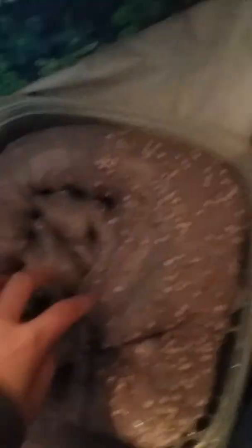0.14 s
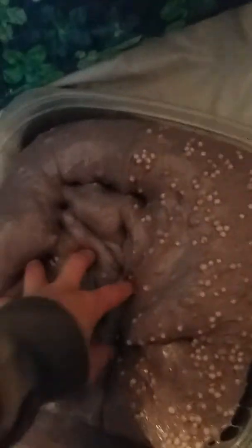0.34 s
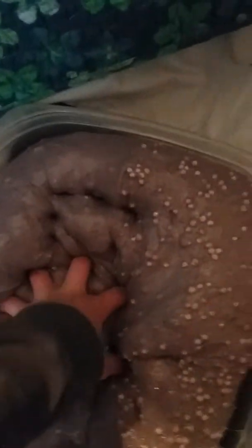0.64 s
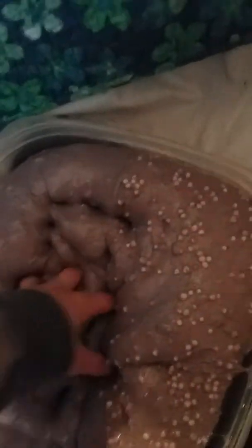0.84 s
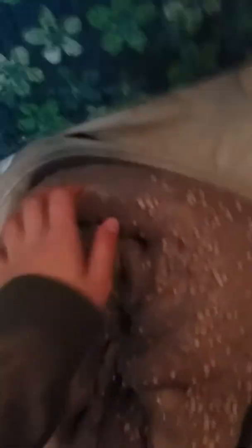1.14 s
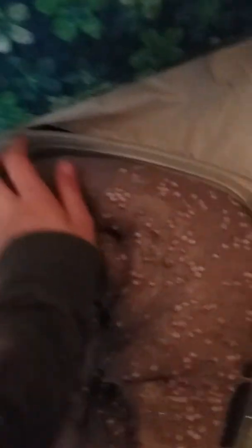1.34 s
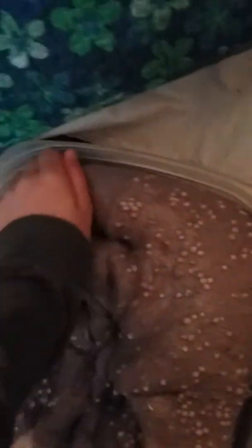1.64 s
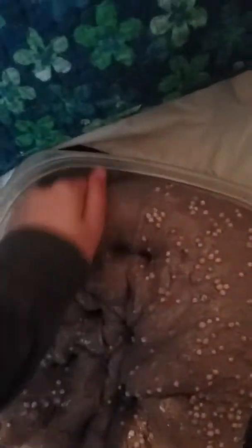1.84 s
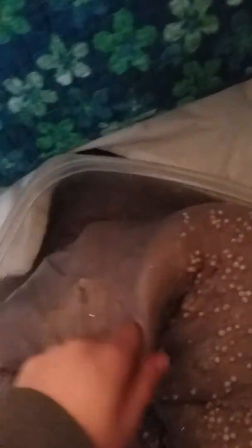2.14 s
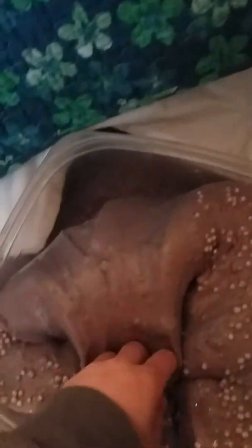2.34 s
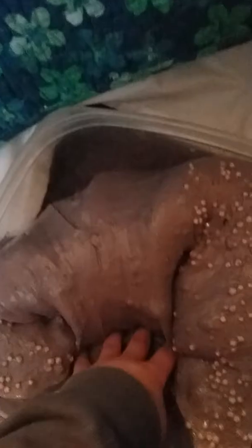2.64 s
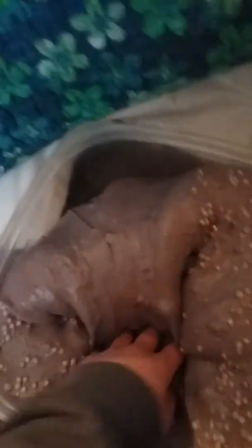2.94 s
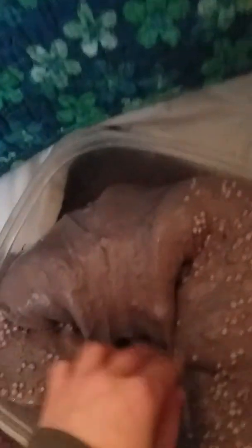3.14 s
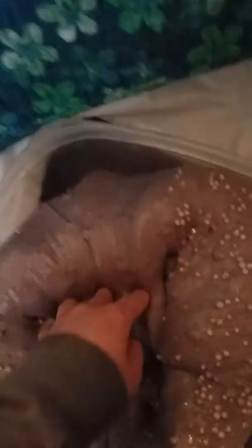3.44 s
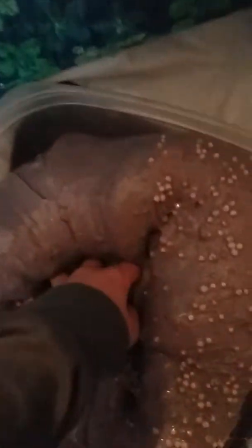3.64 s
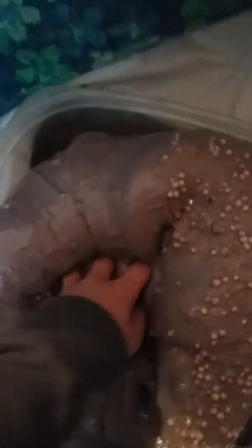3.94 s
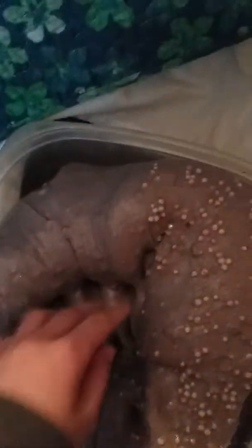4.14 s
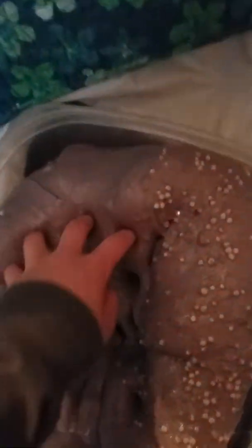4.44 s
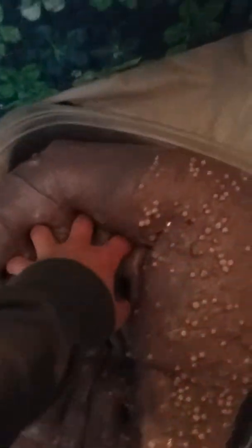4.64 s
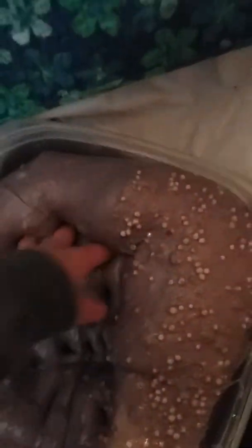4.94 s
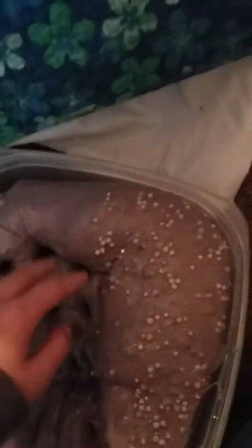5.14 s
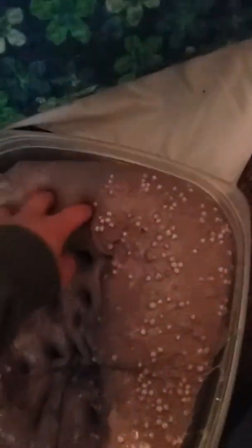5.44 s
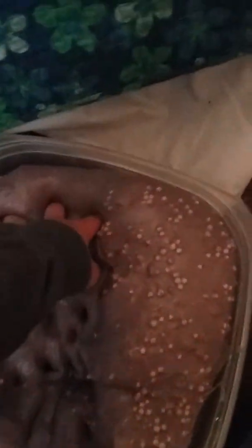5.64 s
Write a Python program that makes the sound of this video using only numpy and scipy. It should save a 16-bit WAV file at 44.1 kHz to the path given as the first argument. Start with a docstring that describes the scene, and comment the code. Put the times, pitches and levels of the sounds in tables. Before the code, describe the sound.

Sharp wet pops and clicky crackles burst from squeezed bead slime, close up in a quiet small room, over a low hum.

```python
"""A hard squeeze of slime snaps and crackles at once, close by in a small, soft room; more squeezes follow.
A hand works thick slime with foam beads in a plastic tub and bursts runs of air pockets: noise bursts make
the skin snap, damped sines make the pockets ring, and random clicks make the tiny bubbles crackle.
The hand that holds the phone rubs and bumps it near the right microphone, as coloured noise and low thumps.
Faint room noise and a wavering low hum lie under everything."""
import sys
import numpy as np
from scipy import signal
from scipy.fft import rfft, irfft
from scipy.io import wavfile

SR = 44100
rng = np.random.default_rng(int(sys.argv[2]) if len(sys.argv) > 2 else 0)


def master_out(mix):
    """Clip the mix to full scale and print it as 16-bit PCM to the path in sys.argv[1]."""
    frames = np.transpose(np.atleast_2d(mix))
    ceiling = np.clip(frames, -1, 1)
    pcm = np.round(ceiling * 32767).astype(np.int16)
    wavfile.write(sys.argv[1], SR, pcm)


N = 254456


def gain_of(db):
    """Decibels to gain."""
    return 10 ** (np.asarray(db) / 20)


def evened(x):
    """Scales to rms 1."""
    return x / np.sqrt(np.mean(x ** 2) + 1e-20)


def read(points, hz):
    """Reads a curve of (frequency, value) points on a log-frequency axis."""
    f, value = np.transpose(points)
    return np.interp(np.log(hz + 1), np.log(f + 1), value)


def add(mix, s, sound, lead_s=0):
    """Mixes a sound in at s seconds, shifted by its lead-in."""
    at = round((s + lead_s) * SR)
    sound = sound[..., max(-at, 0):]
    part = mix[..., max(at, 0):][..., :sound.shape[-1]]
    part += sound[..., :part.shape[-1]]


def colour(x, points, size=4096):
    """Minimum-phase filter with the given spectrum, so that attacks stay sharp."""
    level_db = read(points, abs(np.fft.fftfreq(size, 1 / SR)))
    log_gain = np.log(gain_of(level_db))
    response = np.exp(np.conj(signal.hilbert(log_gain)))
    taps = np.fft.ifft(response).real[:size // 2]
    return signal.oaconvolve(x, taps[None], axes=1)[:, :x.shape[1]]


def resonate(x, hz, width):
    """A resonance with gain 1 at its peak."""
    b, a = signal.iirpeak(min(hz, SR / 2 - 2000), hz / min(width, SR / 4), SR)
    return signal.lfilter(b, a, x)


def drift(hz):
    """Slow random wander of rms 1, its spectrum fading smoothly towards and above hz."""
    fade = np.exp(-(np.fft.rfftfreq(N, 1 / SR) / hz) ** 2)
    return evened(irfft(rfft(rng.standard_normal(N)) * fade, N))


def clicks(per_s, spread_db, size=N):
    """Random clicks, most of them small."""
    height = gain_of(spread_db * np.minimum(rng.exponential(1, size), 4))
    sign = rng.choice([-1, 1], size)
    return height * sign * (rng.random(size) < per_s / SR)


def pocket(t, hz, cycles, opening_s, rise):
    """An air pocket rings and dies within a few cycles; its pitch rises as the hole widens."""
    turns = hz * t * (1 + rise * (1 - np.exp(-t * hz / cycles / 2)))
    envelope = (1 - np.exp(-t / opening_s)) * np.exp(-t * hz / cycles)
    return envelope / envelope.max() * np.sin(2 * np.pi * turns)


def thumps(rows, cycles, opening_s):
    """Low, heavily damped blows of steady pitch."""
    out, t = np.zeros(N), np.arange(4400) / SR
    for s, db, hz in rows:
        add(out, s, gain_of(db) * pocket(t, hz, cycles, opening_s, rise=0))
    return out


def swell(t, rise_s, fall_s, hold_s=0):
    """Rises until t = 0, holds, dies away."""
    return np.exp(np.minimum(t / rise_s, 0) - np.maximum(t - hold_s, 0) / fall_s)


# likeness of the two microphones in the room noise: (frequency [Hz], correlation [0 to 1])
MIC_LIKENESS = [(100, 0.25), (1000, 0.47), (2500, 0.21), (5000, 0.083), (16000, 0.087)]


def pair(z):
    """Two unrelated signals become a microphone pair, partly alike by frequency."""
    a, b = rfft(z)
    same = read(MIC_LIKENESS, np.fft.rfftfreq(z.shape[1], 1 / SR))
    return irfft(np.array([a, same * a + np.sqrt(1 - same ** 2) * b]), z.shape[1])


# spectrum of the still air in the room: (frequency [Hz], relative level per Hz [dB])
AIR_SPECTRUM = [(20, -19), (35, -8.5), (55, 14), (85, 8), (130, 11), (190, 2.5), (350, -7), (700, -12.5),
                (1000, -11.5), (2500, -14), (6000, -14), (16000, -19)]
AIR_DB = -67  # rms
# partials of the low hum: (frequency [Hz], middle rms level [dB], rms pitch wander [Hz])
HUM_PARTIALS = [(56, -69, 4.5), (113.8, -68.5, 8.4)]


def background():
    """Coloured noise for the room air, and sines that waver in pitch and level for the hum."""
    air = gain_of(AIR_DB) * evened(colour(pair(rng.standard_normal((2, N))), AIR_SPECTRUM))
    hum = np.zeros(N)
    for hz, db, wander_hz in HUM_PARTIALS:
        level = gain_of(db + 3.0 * drift(hz=9))
        turns = np.cumsum(hz + wander_hz * drift(hz=6.2)) / SR
        hum += level * np.sqrt(2) * np.sin(2 * np.pi * turns)
    return air + hum


# spectrum of skin rubbing the case: (frequency [Hz], relative level per Hz [dB])
RUB_SPECTRUM = [(25, -31), (38, -15), (60, -9.5), (115, 11), (190, 0), (380, -4.5), (580, -2), (950, -12),
                (1300, -9), (2000, -18.5), (2700, -14), (4300, -27), (8500, -27.5), (16000, -38)]
# the grip slides on the phone: (middle [s], length [s], peak level before the rub trim [dB])
GRIP_SLIDES = [(0.01, .1, -62), (0.329, .14, -46), (0.534, 0.2, -49), (0.716, 0.13, -53),
               (1.381, 0.25, -59), (1.846, 0.42, -56.5), (2.235, .13, -53), (2.406, .12, -48),
               (2.75, 0.5, -61), (2.858, 0.14, -52.5), (3.145, 0.16, -50), (3.354, 0.26, -58),
               (3.606, 0.13, -48), (3.842, 0.38, -53), (4.528, 0.29, -63), (4.671, 0.17, -48),
               (5.558, 0.042, -59), (5.64, 0.14, -55)]
# the grip shifts and bumps the phone: (time [s], level [dB], pitch [Hz])
GRIP_BUMPS = [(.262, -39, 61), (.338, -38.5, 72), (2.87, -45, 102), (4.665, -37, 113), (5.538, -37.5, 65.4),
              (5.552, -48, 55), (5.627, -42, 117)]
SLIDE_EDGE_DB = -13.5  # level at either end of a slide, against its middle
RESTING_DB = -77.5  # the resting hand never quite keeps still; before the rub trim


def grip(rub_db=1, left_db=-19, flutter_db=2):
    """Skin creeps over the phone's case in small slips and bumps it, next to the right microphone."""
    t = np.arange(N) / SR
    sliding = gain_of(RESTING_DB)
    for middle, length, db in GRIP_SLIDES:
        from_middle = (2 * (t - middle) / length) ** 2  # 1 at the ends
        sliding = sliding + gain_of(db + SLIDE_EDGE_DB * np.minimum(from_middle, 10))
    slips = rng.standard_normal((2, N)) + clicks(per_s=130, spread_db=4)
    rub = evened(colour(slips, RUB_SPECTRUM)) * gain_of(flutter_db * drift(hz=35))
    bumps = thumps(GRIP_BUMPS, cycles=0.83, opening_s=0.003)
    case = rub * sliding * gain_of(rub_db) + bumps
    return case * gain_of([[left_db], [0]])


# decay of the room tail: (frequency [Hz], time to fall 60 dB [s])
ROOM_DECAY = [(150, 0.44), (500, 0.32), (1200, 0.049), (3000, 0.23), (8000, 0.073), (16000, 0.21)]


def room(x, near_db=-12, near_s=0.0094, first_s=0.0011, tail_db=-23):
    """Quick reflections from the tub walls and the arm, then a faint room tail."""
    t = np.arange(SR // 2) / SR
    taps = rng.choice([-1., 1.], (2, len(t))) * (rng.random((2, len(t))) < 4000 / SR)
    near = taps * (t > first_s) * np.exp(-t / near_s)
    late_noise = rng.standard_normal(taps.shape) * (t > .008)
    hz, at, z = signal.stft(late_noise, SR, nperseg=256)
    decay = gain_of(-60 * at / read(ROOM_DECAY, hz)[:, None])
    tail = signal.istft(z * decay, SR, nperseg=256)[1][:, :len(t)]
    echo = np.zeros(taps.shape)
    for db, part in [(near_db, near), (tail_db, tail)]:
        echo += gain_of(db) * part / np.linalg.norm(part, axis=1, keepdims=True)
    return x + signal.oaconvolve(x, echo, axes=1)[:, :N]


# resonances in the hollow of the tub: (frequency [Hz], width [Hz], relative level [dB])
TUB_MODES = [(169, 97, -9), (312.2, 46, -7), (597, 42, -6), (850, 59, -21.5), (981.5, 71, -2.5),
             (1310, 19, -11), (1830, 97, -6), (3000, 140, -9)]


def tub(x):
    """The hollow of the tub rings along."""
    return sum(gain_of(db) * resonate(x, hz, width) for hz, width, db in TUB_MODES)


# large pockets that collapse under a hard squeeze: (time [s], level [dB], pitch [Hz])
LARGE_POCKETS = [(0.011, -43, 300), (0.967, -34, 400), (0.9833, -38.5, 215), (1.7, -44, 400),
                 (3.088, -47.5, 210), (4.115, -35.5, 240), (4.9985, -29.5, 570), (5.047, -32, 350)]


def gulps():
    """Large pockets collapse with a low, short thump."""
    return thumps(LARGE_POCKETS, cycles=0.86, opening_s=0.0008)


GRAB_S, LET_GO_S = .005, .017  # rise and fall time constants of the hand's pressure
BUILD_DB = 7.5  # growth of the pressure through a stretch of pressing


def pressure(t, length):
    """The fingers grab, press harder and harder, and let go."""
    build = gain_of(-BUILD_DB * np.clip(1 - t / length, 0, 1))
    return swell(t, GRAB_S, LET_GO_S, length) * build


# the fingers work the slime, one row for each stretch of pressing; a squeeze may take several:
# (start [s], length [s], crackle level [dB], squelch level [dB], pitch of the small pockets [Hz])
PRESSINGS = [(0.0, 0.073, -53.5, -53.5, 1240), (0.831, 0.021, -57.5, -59.5, 900),
             (0.894, .095, -48.5, -47.5, 946), (1.348, 0.11, -62.5, -63, 1200),
             (1.636, 0.027, -53.5, -54, 1100), (1.854, 0.056, -60.5, -51, 850),
             (1.908, 0.081, -56.5, -54.5, 730), (2.017, 0.045, -61, -64.5, 1770),
             (2.964, 0.03, -56.5, -59, 1600), (3.029, 0.071, -54, -53, 1250),
             (3.969, 0.027, -56.5, -57, 850), (4.035, 0.076, -46, -47.5, 967),
             (4.972, 0.045, -47.5, -52.5, 1050), (5.06, 0.047, -52.5, -57.5, 1000)]
# spectrum of the tiny bubbles: (frequency [Hz], relative level per Hz [dB])
CRACKLE_SPECTRUM = [(100, -19.5), (800, -10), (2200, 2), (4500, -0.5), (8500, -1), (12000, -4),
                    (16000, -8.5)]
BURST_CRACKLE_DB = -17  # crackle around each burst, against the snap level in its row
CRACKLE_SWELL, CRACKLE_FADE = 1.5, 2.6  # its swell and its fading [tearing times]


def crackle():
    """Tiny bubbles click at random under the fingers and around each burst."""
    t, power = np.arange(-.05, .3, 1 / SR), np.zeros(N)
    for start, length, db, _, _ in PRESSINGS:
        add(power, start, (gain_of(db) * pressure(t, length)) ** 2, t[0])
    for s, snap_db, _, tear_s, _, _ in AIR_POCKETS:
        around = swell(t, CRACKLE_SWELL * tear_s, CRACKLE_FADE * tear_s)
        add(power, s, (gain_of(snap_db + BURST_CRACKLE_DB) * around) ** 2, t[0])
    sparks = clicks(per_s=2500, spread_db=5)  # shared by both microphones
    both = np.array([sparks + clicks(per_s=4400, spread_db=7.5) for _ in range(2)])
    return np.sqrt(power) * evened(colour(both, CRACKLE_SPECTRUM))


SHED_SQUELCH_DB = -22.5  # small pockets shaken loose by a burst, against the pocket level in its row
SETTLE_S = 0.011  # they die away with this time constant


def squelch(spread=1.9):
    """Small pockets bloop around the pitch of each stretch of pressing, lifted just after a burst."""
    t, ring_t, out = np.arange(-.05, .3, 1 / SR), np.arange(1000) / SR, np.zeros(N)
    for start, length, _, db, centre_hz in PRESSINGS:
        power = (gain_of(db) * pressure(t, length)) ** 2
        for s, _, _, _, air_db, _ in AIR_POCKETS:
            if start - GRAB_S <= s < start + length + LET_GO_S:
                shed = gain_of(air_db + SHED_SQUELCH_DB) * swell(t + start - s, .001, SETTLE_S)
                power += shed ** 2
        bloops = np.zeros(len(t))
        for hz in centre_hz * spread ** np.linspace(-1, 1, num=7):
            ring = pocket(ring_t, hz, cycles=1.3, opening_s=0.00021, rise=0.15)
            bloops += signal.fftconvolve(clicks(per_s=220, spread_db=2.5, size=len(t)), ring)[:len(t)]
        add(out, start, np.sqrt(power) * evened(bloops), t[0])
    return out


# the loud air pockets, one row a burst; levels are before the trims in pops():
# (time [s], snap level [dB], snap centre [Hz], tearing time [s], pocket level [dB], pocket pitch [Hz])
AIR_POCKETS = [(0.0082, -36.5, 9100, 0.00071, -48, 1510), (0.0566, -41, 11500, 0.0014, -51, 1380),
               (0.0702, -19, 9400, 0.00067, -18, 1337), (0.8216, -41, 8600, .0007, -53, 740),
               (0.8838, -27, 8800, 0.00031, -44, 1000), (0.8952, -24.5, 7950, 0.0038, -46, 1260),
               (0.9075, -22, 4800, 0.0024, -29, 1440), (0.9135, -17.5, 4700, 0.0005, -41, 1500),
               (0.918, -24, 4630, 0.0013, -33, 1230), (0.9382, -24.5, 8350, .0008, -38, 1270),
               (0.944, -30, 9100, .0022, -31.5, 920), (0.9589, -25.5, 3100, 0.0015, -36, 1060),
               (0.9841, -16, 2600, 0.00057, -27.5, 926), (1.3196, -39, 5360, 0.0013, -52, 930),
               (1.3463, -16.5, 4600, 0.00031, -26.5, 846), (1.657, -36, 12000, .0008, -42.5, 1310),
               (1.6834, -45, 2500, .0008, -42, 620), (1.7013, -41.5, 3400, .00046, -29.5, 770),
               (1.8338, -50, 7000, .0005, -44, 910), (1.8552, -30, 3330, 0.00058, -43, 645),
               (1.8815, -38, 8000, .0006, -40, 710), (1.8897, -43, 5160, 0.00055, -38.5, 760),
               (1.9356, -26.5, 12100, 0.00074, -40, 840), (1.9436, -25, 6500, 0.00048, -41, 586),
               (1.9658, -30.5, 10000, 0.001, -47, 724), (2.965, -38, 11000, 0.0042, -46, 1680),
               (3.018, -31.5, 10800, .0005, -38, 1390), (3.0225, -16, 10300, 0.0004, -22, 1480),
               (3.0261, -26, 9500, .0005, -31, 1250), (3.055, -19, 6240, 0.00038, -29, 1240),
               (3.059, -11, 6300, 0.00072, -22.5, 1410), (3.0626, -16, 6060, 0.0021, -24, 1210),
               (3.0718, -33, 5900, .0015, -24.5, 1430), (3.086, -23, 5900, 0.0012, -17.5, 1652),
               (3.0897, -16, 5970, 0.0011, -11, 1194), (3.0918, -16, 6400, .0011, -17, 1326),
               (3.9711, -45, 5840, .001, -47, 900), (4.0119, -10.5, 7600, 0.00014, -32.5, 1050),
               (4.019, -11, 8050, 0.00028, -20.5, 960), (4.03, -42, 4800, 0.002, -32.5, 634),
               (4.0576, -18.5, 4200, 0.0022, -32, 1135), (4.0626, -12, 3500, 0.00036, -22.5, 1140),
               (4.0689, -4.5, 3960, 0.00011, -17, 1050), (4.0729, -16.5, 3440, 0.0024, -17, 974),
               (4.0972, -21.5, 10050, 0.0011, -35, 1200), (4.115, -18, 6500, 0.0012, -18.5, 1060),
               (4.9945, -33, 3000, .0012, -35, 1120), (4.999, -10, 3480, 0.0011, -19, 965),
               (5.0041, -16.5, 5260, 0.0012, -18, 1113), (5.0276, -26.5, 5910, 0.00073, -36, 1710),
               (5.041, -12, 8470, 0.00083, -29.5, 1110), (5.042, -14.5, 8700, 0.0011, -23.5, 1050),
               (5.0481, -19.5, 4130, 0.0028, -30.5, 710), (5.0812, -31.5, 5170, 0.0022, -40, 990),
               (5.0879, -39, 5100, 0.0024, -39, 1190)]
# colour laid over all the snaps: (frequency [Hz], relative level per Hz [dB])
SNAP_SPECTRUM = [(60, -24.5), (300, -8.5), (1000, 0.5), (2100, 1.5), (3100, -4), (5800, -3.5), (8500, -9),
                 (12000, -8.5), (14500, -2), (16500, -5.5)]
PORT_LAG_S, RIGHT_DB = .00008, 2  # pockets ring sooner on the left and louder on the right
SHARED = 0.13  # amplitude of the snap noise common to both microphones, against 1 for each one's own


def pops(snap_db=-1, pocket_db=-1, snap_s=0.00028, tear_db=-8, breadth=0.32, cycles=1.2, opening_s=0.0004,
         rise=.12, overtone=3.0, overtone_db=-9):
    """The skin of each pocket starts to tear, snaps at its own pitch, and lets the air inside ring."""
    snaps, rings, t = np.zeros((2, N)), np.zeros((2, N)), np.arange(1400) / SR
    from_snap = abs(t - t.mean())  # the tearing swells up to the snap and dies after it
    for s, skin_db, skin_hz, tear_s, air_db, air_hz in AIR_POCKETS:
        tear = gain_of(tear_db) * np.exp(-from_snap / tear_s / 2)
        burst = np.exp(-from_snap / snap_s) + tear
        shared, *own = rng.standard_normal((3, len(t)))
        grain = SHARED * shared + np.array(own)
        snap = resonate(grain * burst, skin_hz, breadth * skin_hz)
        snap *= np.linalg.norm(burst) / np.linalg.norm(snap, axis=1, keepdims=True)
        add(snaps, s, gain_of(skin_db + snap_db) * snap)

        lower = pocket(t, air_hz, cycles, opening_s, rise)
        # a finger hole is a pipe closed at one end, so its overtone is the third harmonic
        upper = pocket(t, overtone * air_hz, overtone * cycles, opening_s, rise)
        ring = gain_of(air_db + pocket_db) * (lower + gain_of(overtone_db) * upper)
        add(rings[0], s - PORT_LAG_S, ring)
        add(rings[1], s, gain_of(RIGHT_DB) * ring)
    centred = np.roll(snaps, -len(t) // 2, axis=1)  # puts the middle of each burst on its time
    return colour(centred, SNAP_SPECTRUM) + rings


def scene():
    """Slime in its tub and room, the grip, the background."""
    slime = gulps() + crackle() + squelch() + pops()
    return room(slime + gain_of(2.0) * tub(slime)) + grip() + background()


LOW_HZ, EDGE_HZ = 42, 16100  # cutoffs of the phone's pass band


def record(dry):
    """The phone cuts the deepest rumble and the top of the treble."""
    thinned = signal.sosfilt(signal.butter(6, LOW_HZ, "high", fs=SR, output="sos"), dry)
    treble_cut = signal.firwin(511, EDGE_HZ, window=("kaiser", 9), fs=SR)
    return signal.oaconvolve(thinned, treble_cut[None], "same")


dry = scene()
out = record(dry)
master_out(out)
```